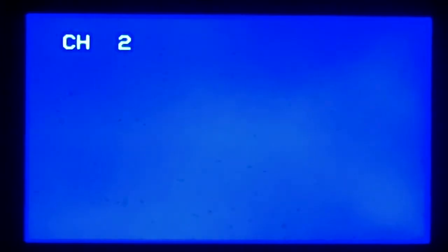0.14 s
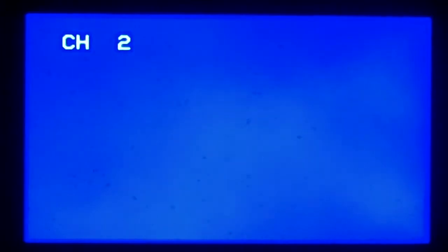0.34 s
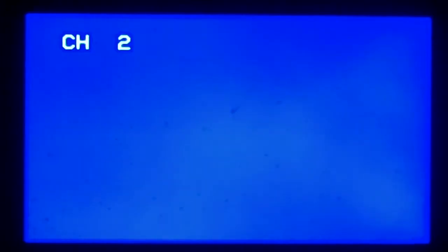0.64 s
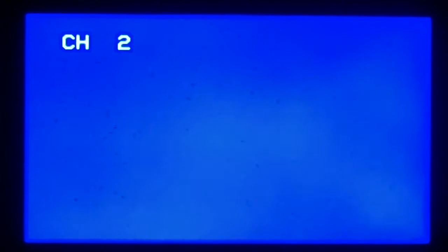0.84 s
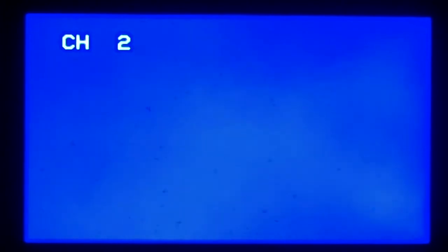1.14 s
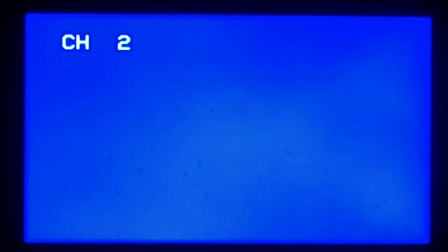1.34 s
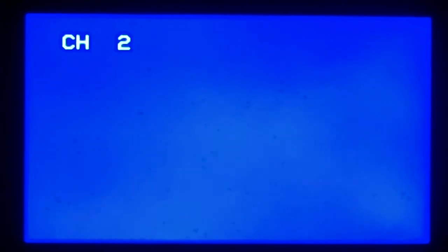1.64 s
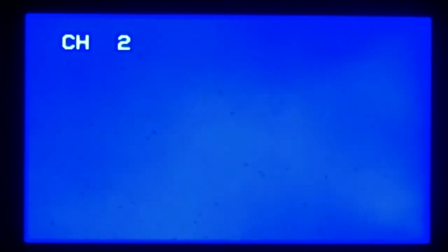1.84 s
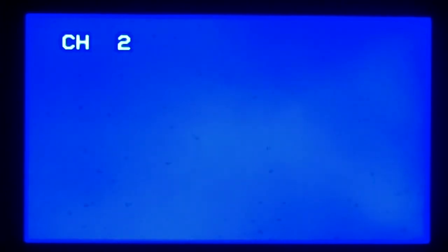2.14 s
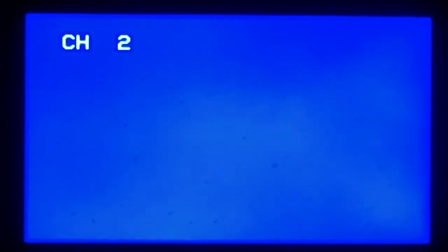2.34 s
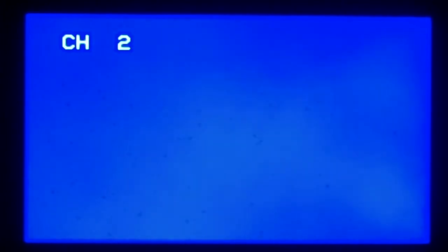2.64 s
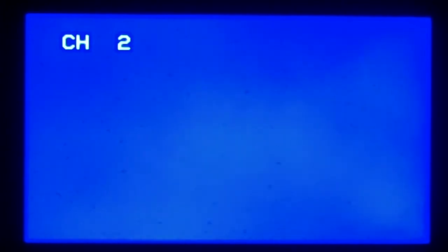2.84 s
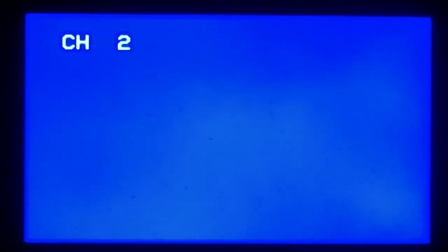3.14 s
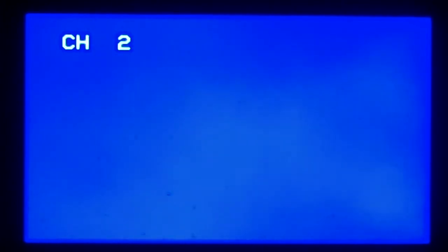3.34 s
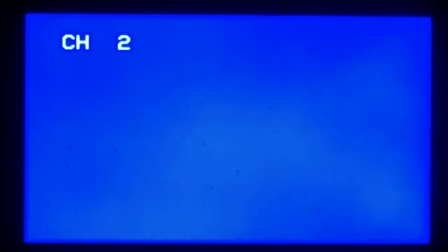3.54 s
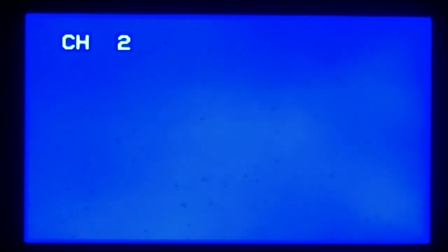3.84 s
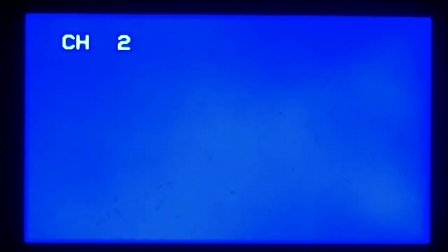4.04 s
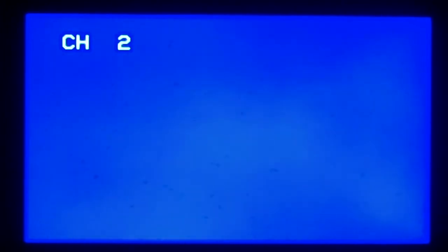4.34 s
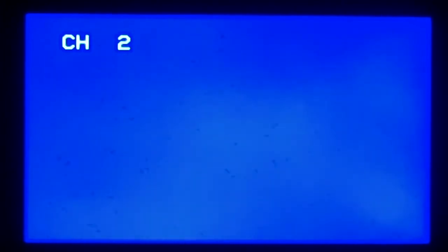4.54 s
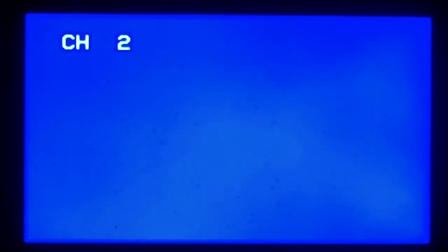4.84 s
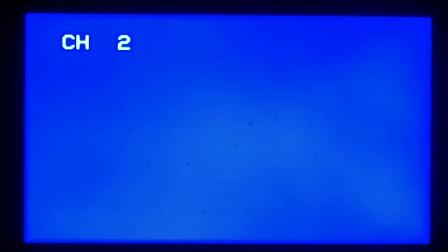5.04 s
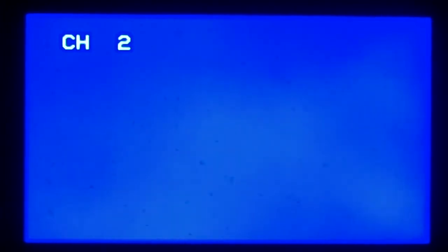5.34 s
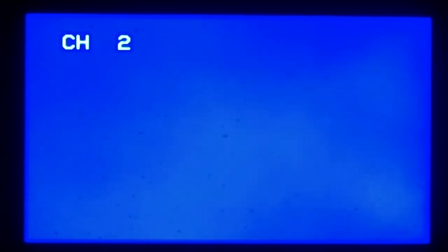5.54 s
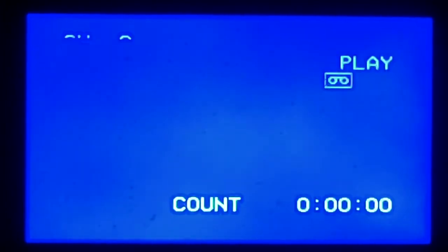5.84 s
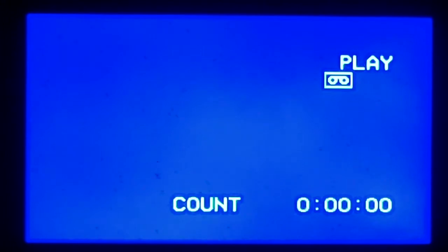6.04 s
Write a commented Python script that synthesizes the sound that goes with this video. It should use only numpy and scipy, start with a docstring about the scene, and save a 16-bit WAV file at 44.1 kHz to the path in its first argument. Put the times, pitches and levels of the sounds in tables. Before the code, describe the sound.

Close indoor sound of a cassette loading and threading in a video recorder. Quiet hum and hiss with small scuffs come first, then clustered plastic clicks, a strong chassis knock, gear grinding and a motor squeak. The action thins to light ticks and a soft tape swish before another strong burst of clunks, a few small clicks and a faint whine. Dry and centred.

```python
"""Latches, levers and a cassette knock on the chassis of a video recorder as it threads the tape.
Each blow is a brief cluster of contacts exciting a dense decaying ring and the modes of the case panels;
a spring and a solenoid add damped modes. Loading gears chatter as random contacts coloured by the case,
tape and plastic rub as bright friction noise, and motors whine as narrow bands of noise.
Behind them lie mains hum, faint electronic tones, a low rumble and a smooth hiss."""
import sys
import numpy as np
from scipy import signal
from scipy.fft import rfft, irfft
from scipy.io import wavfile
from scipy.ndimage import uniform_filter1d

SR = 44100
rng = np.random.default_rng(int(sys.argv[2]) if len(sys.argv) > 2 else 0)


def waveform_to_disk(signal):
    """Save audio, clipped to [-1, 1], as 16-bit WAV at the path in sys.argv[1]."""
    frames = np.transpose(np.atleast_2d(signal))
    scaled = np.clip(frames, -1, 1) * 32767
    samples = np.round(scaled).astype(np.int16)
    wavfile.write(sys.argv[1], SR, samples)


N = 273420
TIME = np.arange(N) / SR

# Mains harmonics: (multiple of the mains frequency, mean level [dB])
MAINS_HZ = 59.94
HUM = [(1, -54.5), (2, -56), (4, -72.5), (5, -75.5), (9, -77.5)]
# Faint tones of the electronics: (frequency [Hz]) and (mean level [dB])
TONES_HZ = [538.3, 8538, 8608]
TONES_DB = [-85, -83, -75]
# Spectral shapes of the low rumble and of the hiss: (frequency [Hz], relative density [dB per Hz])
RUMBLE = [(5, -13), (18, -2), (28, 8.5), (42, -0.5), (75, -7), (105, 2), (150, -5), (200, -12), (300, -32),
          (600, -54)]
AIR = [(120, -6), (200, -4.5), (260, -3.5), (520, -9.5), (770, -11), (1130, -13.5), (1600, -14.5),
       (4000, -18), (7500, -19), (8700, -17), (9500, -17.5), (11000, -21), (15500, -22)]
AIR_DB = -58.5

# Motor whines and gear squeaks: (start [s], end [s], frequency [Hz], level [dB], width [Hz])
WHINES = [(3.42, 3.509, 1324, -50, 140), (3.48, 3.596, 4160, -56, 450), (4.043, 4.187, 1454, -67, 200),
          (4.05, 4.5, 1022, -69.5, 450), (4.496, 4.675, 933, -58, 130), (4.138, 4.662, 8070, -68, 500),
          (4.602, 6.4, 5960, -78, 150), (4.856, 5.2, 1420, -76, 22), (6.02, 6.4, 1592, -71.5, 35)]

# Tape sliding steadily over the guides, and one brisk pull round the drum: (start [s], end [s], level [dB])
TAPE_RUN = (4.5, 5.6, -61)
TAPE_PULL = (4.62, 4.69, -48)
TAPE_RISE_S, TAPE_STOP_S, PULL_EASE_S = 0.033, 0.04, 0.069
# Soft scuffs of plastic: (time [s], level [dB], half length [s])
SCUFFS = [(0.331, -49.5, 0.016), (0.838, -57.5, .008), (0.923, -61.5, 0.089), (0.97, -63, 0.018),
          (1.434, -57.5, 0.013), (5.05, -60, 0.0056), (5.76, -57, 0.0078), (5.816, -55, 0.021)]
# Spectral shape of rubbing: (frequency [Hz], relative density [dB per Hz])
RUB = [(300, -4.5), (1500, -8), (4000, -10), (6000, -6), (7300, -6.5), (8600, -1), (9500, 0.5),
       (10700, -5.5), (12200, -13), (15500, -10.5)]

# Loading gears turning lightly, and labouring at each cam stroke: (start [s], end [s], level [dB])
GEARS_IDLE = (2.09, 5.7, -70.5)
CAM_STROKES = [(2.798, 2.87, -53.5), (3.11, 3.174, -54), (3.178, 3.26, -47.5), (3.383, 3.557, -51),
               (3.652, 3.743, -54), (4.752, 4.807, -62), (5.385, 5.452, -55.5)]
BITE_S, EASE_S = 0.028, 0.03  # the gears take up the load, and ease off
# Spectral tilt of the gears against the case response: (frequency [Hz], gain [dB])
GEAR_TILT = [(150, 4), (350, 3.5), (700, 3), (1350, -4), (2500, -4), (5000, -8.5), (9000, -10.5),
             (15000, -16)]

# Broad response of the chassis: (frequency [Hz], relative density [dB per Hz])
CHASSIS = [(60, -15.5), (140, -2), (220, -8), (450, -14), (700, -1), (1100, -5), (2600, -4.5), (4000, -4),
           (5700, -6.5), (6800, -9.5), (9200, -5), (10600, -12), (12800, -23.5), (15500, -20)]
# Resonances of the case and deck: (frequency [Hz], width [Hz], lift [dB])
RESONANCES = [(164, 28, 7.5), (343, 79, 12.1), (423, 24, 6.7), (498, 24, 10.4), (622, 97, 8.9),
              (817, 30, 6.3), (922, 55, 5.2), (1010, 15, 4.5), (1097, 64, 5.2), (1299, 73, 6.3),
              (1441, 55, 8.4), (1568, 38, 5.5), (1669, 21, 4.9), (1925, 133, 5.9), (2224, 24, 3.5),
              (2787, 31, -4.7), (3356, 116, 3.5), (3634, 65, 5.2), (4302, 48, 3.1), (4592, 209, 3.8),
              (5348, 68, 2.6), (5919, 398, 5.1), (6866, 400, 4.0), (7570, 91, 3.2), (8341, 1400, 6.0),
              (9034, 108, 2.7), (9446, 124, 5.5), (11101, 230, 5.1)]
# Decay of the chassis ring: (frequency [Hz], time to fall 60 dB [s])
RING = [(150, 0.45), (400, 0.24), (1000, 0.21), (2800, 0.18), (8000, 0.18), (15000, 0.18)]
# Case panels that sing on after a blow: (frequency [Hz]) and (relative level [dB], time to fall 60 dB [s])
PANELS_HZ = [165, 334, 646, 809, 1290, 1441, 3309, 3624, 5607, 8046, 8717, 9035, 9439]
PANELS = [(-18, 0.49), (-23.5, 0.5), (-14.5, 0.19), (-17.5, 0.19), (-25, 0.31), (-30.5, 0.34), (-24, 0.19),
          (-37, 0.18), (-21, 0.25), (-34, 0.13), (-13, 0.25), (-16, 0.1), (-19, 0.22)]

# Modes of a solenoid's dull tock: (frequency [Hz], relative level [dB], time to fall 60 dB [s])
SOLENOID = [(71, 10, 0.11), (183, 1.5, 0.099), (340, 7.5, 0.04), (510, -4, 0.081), (894, 0, 0.067),
            (950, 0, 0.065), (1163, -2, 0.092), (1270, -14, .08)]
# Strokes of the solenoid: (time [s], gain [dB])
STROKES = [(5.432, -49), (5.708, -49.5)]
# Modes of a small steel spring: (frequency [Hz], relative level [dB], time to fall 60 dB [s])
SPRING = [(4460, 2, 0.044), (5170, -5, 0.087), (5870, 4, 0.12), (5960, -2, 0.069), (6740, 2, .08),
          (6900, 6, 0.18), (7200, -4, .09), (7950, -14, .12), (9660, 2, .06), (10460, -3, .08)]
# Plucks of the spring: (time [s], gain [dB])
PLUCKS = [(3.637, -51), (5.1636, -58.5), (5.1967, -66)]
# Spectral shape of the spring's release: (frequency [Hz], relative density [dB per Hz])
SNAP = [(1000, -32), (3400, -37), (4300, 0), (7000, -1), (8500, 5), (10500, 3), (13000, -23), (15500, -13)]

# Blows of latches, levers and cassette: (time [s], ring gain before the common trim [dB],
# then relative to the ring: contact crack [dB], body [dB], treble [dB])
BLOWS = [(2.0307, -41, 9, -2.5, -5), (2.0669, -38.5, 7.5, -1.5, -2.5), (2.0796, -33.5, 11.5, -3, -2.5),
         (2.196, -56.5, 0, 17.5, -8), (2.4085, -39.5, 5.5, 1.5, -5), (2.654, -46.5, 1, 4, -12),
         (2.6676, -40, 11.5, -2, -7), (2.684, -43.5, 11.5, -2, -2.5), (2.699, -48.5, 11, 3.5, 0),
         (2.852, -44.5, 11, 2, -5), (2.9167, -45.5, 4.5, 2, -13), (3.0125, -41, -7, 6, -11),
         (3.02, -25, 9, -2.5, -0.5), (3.0278, -31, 3, -8, -3), (3.181, -44.5, 0.5, 10.5, -9),
         (3.264, -43.5, 9.5, -3, -10), (3.3435, -41.5, 6.5, 4, 0), (3.3561, -32, 2.5, -14, -0.5),
         (3.4526, -46, 3, -3, -7), (3.534, -38, -4, -10, -15), (3.679, -52.5, 6, 8, -8),
         (3.701, -41, 6, 2.5, 3), (3.894, -56.5, -1, 5, -6), (3.9334, -54.5, 2, 9.5, -6),
         (4.0068, -52, 6.5, 1, -5), (4.403, -54.5, 7.5, -12, 1), (4.4446, -47, -1, -8, -5),
         (4.5517, -38.5, 5, 1.5, -8.5), (4.8046, -48, 9, 2, 1.5), (5.2964, -37.5, -3, -3, -4),
         (5.3136, -33.5, -1, 0.5, 4), (5.332, -25, -18, -3, -2.5), (5.359, -27, 6, -1.5, 3),
         (5.432, -47, -1, 8, -5), (5.5285, -50.5, 4.5, 4, 1.5), (5.5858, -54, 5.5, 2, 1),
         (5.8775, -53, 6, -11, 0), (5.9128, -43, 3, -1.5, -3)]
# Contact time of a blow with 0 dB of crack; each HALVING_DB more crack halves it
CONTACT_S, HALVING_DB = 0.0077, 10.5
# Low thud relative to the body; the dB it gains per dB of crack and of treble
THUD_DB, THUD_PER_CRACK, THUD_PER_TREBLE = 1, 0.47, 0.7

START_S, EDGE_HZ = 0.158, 15850  # end of the opening silence; upper band limit


def amp(db):
    """Amplitude gain is an exponential function of decibels."""
    return 10 ** (np.asarray(db) / 20)


def unit(x):
    """Normalization: divides by the root mean square, so that it becomes 1."""
    return x / np.sqrt(np.mean(x ** 2) + 1e-20)


def read(points, hz):
    """Linear interpolation of a spectrum on a logarithmic frequency axis."""
    f, value = np.transpose(points)
    return np.interp(np.log(hz + 1), np.log(f + 1), value)


def add(mix, s, sound):
    """Superposition: adds a sound into the mix at time s."""
    part = mix[round(s * SR):][:len(sound)]
    part += sound[:len(part)]


def colour(x, db_at):
    """Linear filtering in the frequency domain by a rule Hz -> dB; rms 1."""
    hz = np.fft.rfftfreq(len(x), 1 / SR)
    return unit(irfft(rfft(x) * amp(db_at(hz)), len(x)))


def noise(points):
    """Stationary Gaussian noise shaped to a given spectrum; rms 1."""
    return colour(rng.standard_normal(N), lambda hz: read(points, hz))


def drift(rate_hz):
    """Random modulation: low-passed noise wanders slowly; rms 1."""
    return colour(rng.standard_normal(N), lambda hz: -10 * np.log10(1 + (hz / rate_hz) ** 4))


def case(hz):
    """Resonance: response in dB of the case and deck to whatever shakes them."""
    lifts = sum(db / (1 + (2 * (hz - f) / width) ** 2) for f, width, db in RESONANCES)
    return read(CHASSIS, hz) + lifts


def stroke(start, end, db, attack_s, release_s):
    """Envelope of one movement: linear rise, hold and exponential decay."""
    rise = np.clip((TIME - start) / attack_s, 0, 1)
    decay = np.exp(-np.maximum(TIME - end, 0) / release_s)
    return amp(db) * rise * decay


def grains(per_s, spread_db, tail_s, smooth):
    """Shot noise: random contacts of uneven size set the power of noise, over smooth friction."""
    size = amp(spread_db * np.minimum(rng.exponential(1, N), 4))
    clicks = (rng.random(N) < per_s / SR) * size
    t = TIME[:SR // 10]
    # each contact has a sharp onset and a short scattered tail
    tail = rng.standard_normal(len(t)) * (np.exp(-t / tail_s) + 2 * np.exp(-t / 0.00015))
    tail_power = uniform_filter1d(tail ** 2, size=32)
    power = abs(signal.fftconvolve(clicks ** 2, tail_power)[:N])
    return rng.standard_normal(N) * np.sqrt(power / power.mean() + smooth)


def struck(modes):
    """Modal superposition: a small part sounds as a sum of exponentially damped sinusoids."""
    t = TIME[:SR // 3]
    return sum(amp(db) * np.exp(-np.log(1000) * t / t60) * np.sin(2 * np.pi * hz * t)
               for hz, db, t60 in modes)


def room(rumble_db=-60, waver_db=0.5):
    """Harmonic series of the mains and electronic tones, wavering in level, over broadband noise."""
    lines = [(k * MAINS_HZ, db) for k, db in HUM] + list(zip(TONES_HZ, TONES_DB))
    hum = np.zeros(N)
    for hz, db in lines:
        sine = np.sqrt(2) * np.sin(2 * np.pi * (hz * TIME + rng.random()))
        hum += amp(db + waver_db * drift(1.2)) * sine
    return hum + amp(rumble_db) * noise(RUMBLE) + amp(AIR_DB) * noise(AIR)


def motors(fade_s=0.061):
    """Quadrature modulation: two slow noises on sine and cosine make thin, wavering whines and squeaks."""
    out = np.zeros(N)
    for start, end, hz, db, width in WHINES:
        phase = 2 * np.pi * hz * TIME
        running = np.clip(np.minimum(TIME - start, end - TIME) / fade_s, 0, 1)
        whine = drift(width / 2) * np.cos(phase) + drift(width / 2) * np.sin(phase)
        out += amp(db) * running * whine
    return out


def friction(case_share=0.12):
    """Sliding friction: many fine contacts give the bright rub of tape on guides and scuffs of plastic."""
    pressure = stroke(*TAPE_RUN, TAPE_RISE_S, TAPE_STOP_S)
    pressure += stroke(*TAPE_PULL, TAPE_RISE_S, PULL_EASE_S)
    for s, db, half in SCUFFS:
        pressure += amp(db) * np.exp(-0.5 * ((TIME - s) / half) ** 2)
    rub = grains(600, spread_db=4.5, tail_s=0.0066, smooth=0.99)
    return pressure * colour(rub, lambda hz: read(RUB, hz) + case_share * case(hz))


def gears(contacts_per_s=220):
    """Forced vibration: chattering gear teeth excite the case, louder under load."""
    teeth = grains(contacts_per_s, spread_db=-0.5, tail_s=0.018, smooth=0.25)
    load = sum(stroke(*row, BITE_S, EASE_S) for row in [GEARS_IDLE] + CAM_STROKES)
    return load * colour(teeth, lambda hz: read(GEAR_TILT, hz) + case(hz))


def pluck(snap_db=22, snap_s=0.00089, tail_db=-19, tail_s=0.062):
    """Free vibration of a released spring: damped modes after a crisp snap with a faint scattered tail."""
    ping = struck(SPRING)
    t = TIME[:len(ping)]
    snap = colour(rng.standard_normal(len(t)), lambda hz: read(SNAP, hz))
    decay = np.exp(-t / snap_s) + amp(tail_db) * np.exp(-t / tail_s)
    return ping + amp(snap_db) * snap * decay


def impact(ring_db, crack_db, body_db, treble_db):
    """Contact mechanics: a stronger crack means a briefer contact; crack and treble add low thud."""
    contact_s = CONTACT_S * 2 ** (-crack_db / HALVING_DB)
    thud_db = body_db + THUD_DB + THUD_PER_CRACK * crack_db + THUD_PER_TREBLE * treble_db
    return ring_db, crack_db, thud_db, body_db, treble_db, contact_s


def panels(ring_db, crack_db, thud_db, body_db, treble_db, contact_s, spot_db=3.5):
    """Modal excitation: the spot that is struck favours some panel modes over others, at random."""
    tone = [(260, thud_db), (750, body_db), (2000, 0), (8000, treble_db)]
    modes = []
    for hz, (db, t60) in zip(PANELS_HZ, PANELS):
        level_db = db + read(tone, hz) + spot_db * rng.standard_normal()
        modes.append((hz, level_db, t60))
    sound = struck(modes)
    return amp(ring_db) * sound * (1 - np.exp(-TIME[:len(sound)] / contact_s))


def blow(ring_db, crack_db, thud_db, body_db, treble_db, contact_s, rise_share=0.83,
         crack_edge_hz=1400, crack_bright_db=3.0, bite_s=0.00039, spike_db=3, size=1024):
    """Impact excitation: a short crack, then a dense ring damped by frequency, the bass lasting longest."""
    t = TIME[:SR // 2]
    tone = [(260, thud_db), (750, body_db), (2000, 0), (4800, 0), (8000, treble_db)]
    frames = dict(nperseg=size, noverlap=size * 3 // 4)
    hz, age, z = signal.stft(rng.standard_normal(len(t)), SR, boundary="even", **frames)
    shape = unit(amp(case(hz))) * amp(read(tone, hz))
    dying = amp(-60 * age / read(RING, hz)[:, None])
    ring = signal.istft(z * shape[:, None] * dying, SR, **frames)[1][:len(t)]
    ring *= 1 - np.exp(-t / (rise_share * contact_s))  # a long contact builds the ring slowly

    # the contact is a cluster of tiny impacts, bright and too brief to carry bass
    spikes = amp(spike_db * np.minimum(rng.exponential(1, len(t)), 5))
    impacts = rng.choice([-1, 1], len(t)) * spikes
    hardness = [(crack_edge_hz / 2, -12), (crack_edge_hz, -3), (3000, 0),
                (9000, crack_bright_db), (15000, 2 * crack_bright_db)]
    crack = colour(impacts, lambda f: case(f) + read(tone, f) + read(hardness, f))
    crack *= np.exp(-t / contact_s) * (1 - np.exp(-t / bite_s))
    crack *= np.sqrt(np.mean(shape ** 2)) * amp(crack_db)  # level relative to the ring
    return amp(ring_db) * (ring + crack)


def mechanism(blows_db=-0.72):
    """Superposition of every blow with its panel modes, the spring plucks and the solenoid strokes."""
    out = np.zeros(N)
    for s, *row in BLOWS:
        add(out, s, amp(blows_db) * blow(*impact(*row)))
        add(out, s, panels(*impact(*row)))
    for s, db in PLUCKS:
        add(out, s, amp(db) * pluck())
    for s, db in STROKES:
        add(out, s, amp(db) * struck(SOLENOID))
    return out


def scene():
    """Linear superposition of all sources, identical in both channels."""
    mono = room() + motors() + friction() + gears() + mechanism()
    return np.array([mono, mono])


def record(dry):
    """Gating and low-pass filtering: the sound opens after a moment of silence, with a steep band limit."""
    opened = np.clip((TIME - START_S) / 0.005, 0, 1)
    band_limit = signal.firwin(511, EDGE_HZ, window=("kaiser", 9), fs=SR)
    return signal.oaconvolve(dry * opened, band_limit[None], "same")


dry = scene()
out = record(dry)
waveform_to_disk(out)
```